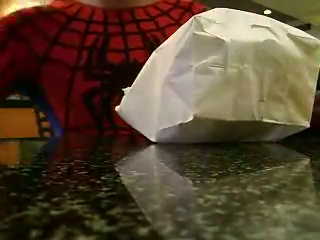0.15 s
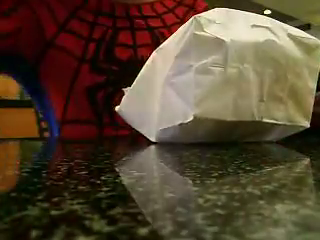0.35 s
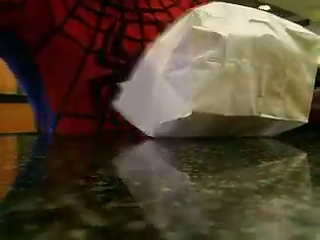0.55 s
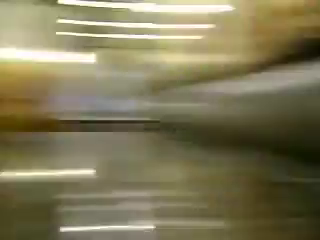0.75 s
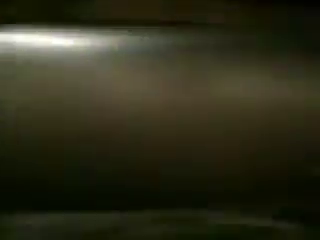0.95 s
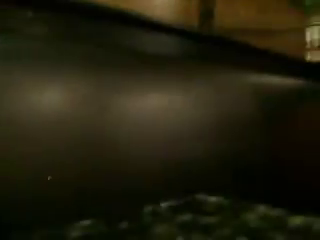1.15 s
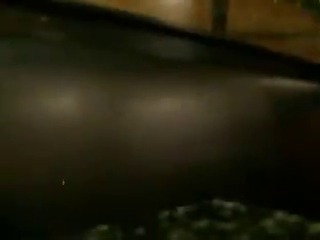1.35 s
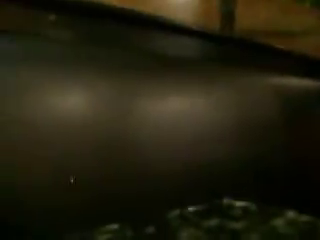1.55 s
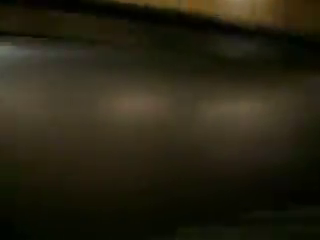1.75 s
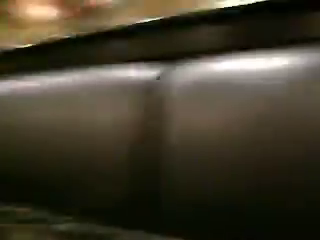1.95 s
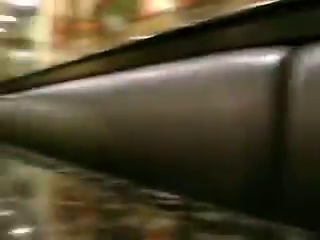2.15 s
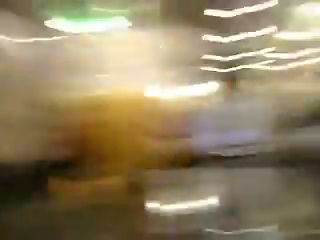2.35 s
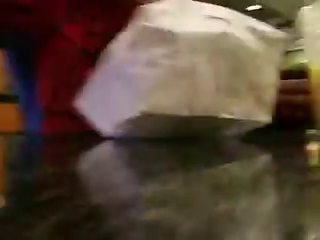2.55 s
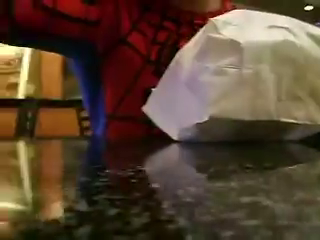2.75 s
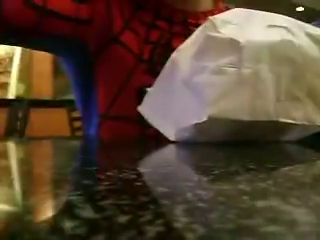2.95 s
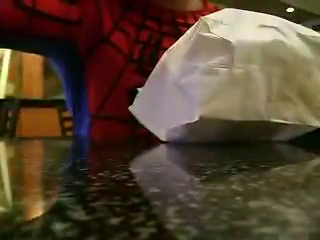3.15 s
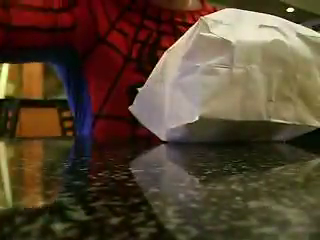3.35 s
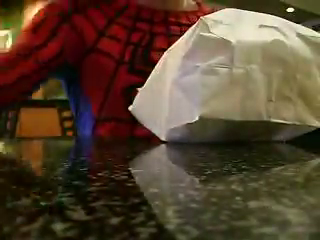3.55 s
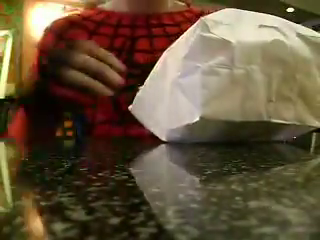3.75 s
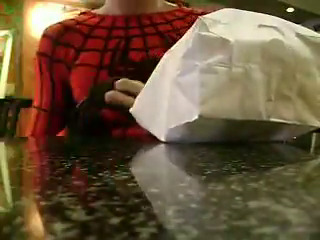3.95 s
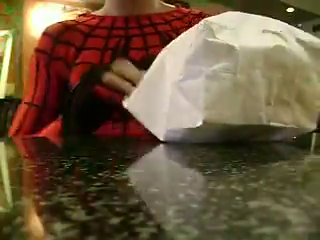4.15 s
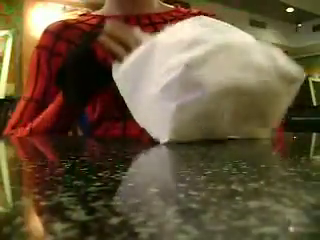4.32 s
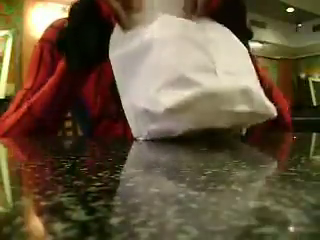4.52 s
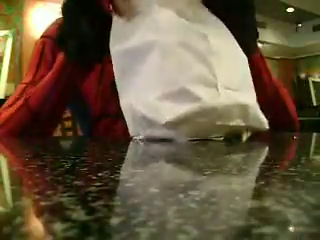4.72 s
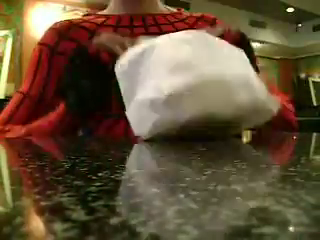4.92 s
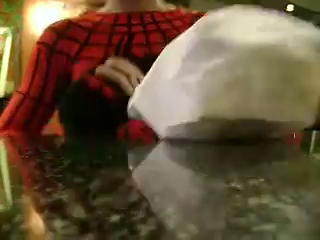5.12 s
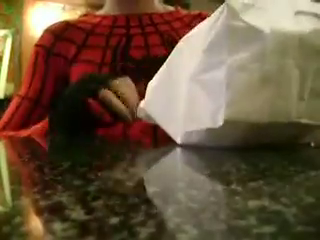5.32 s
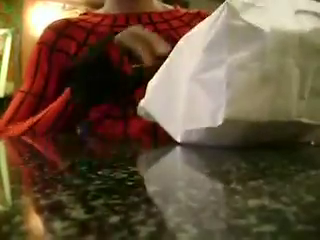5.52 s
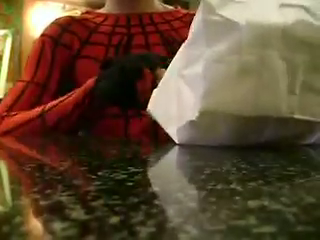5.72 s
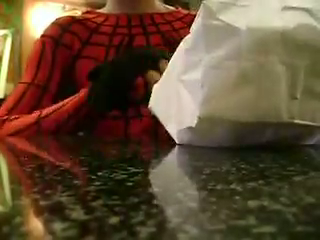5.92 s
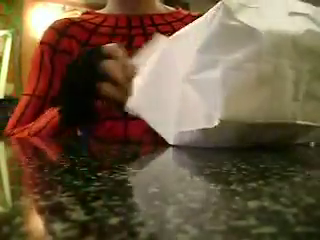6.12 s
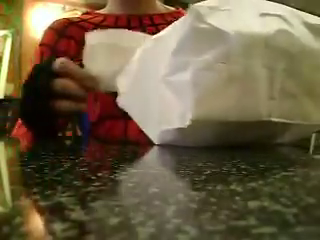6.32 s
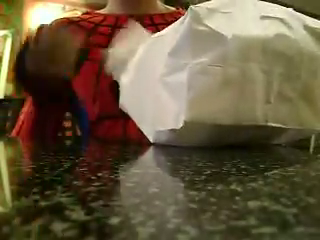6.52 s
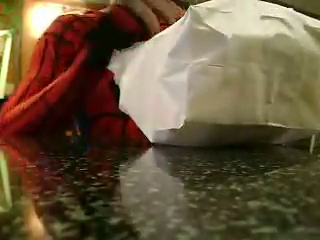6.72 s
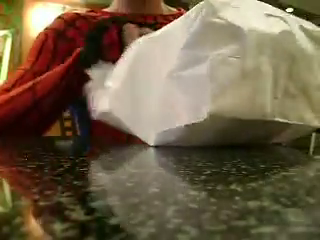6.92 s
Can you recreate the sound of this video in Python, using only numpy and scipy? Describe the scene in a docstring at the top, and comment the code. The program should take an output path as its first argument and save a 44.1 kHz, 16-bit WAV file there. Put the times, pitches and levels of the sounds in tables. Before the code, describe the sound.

Over the steady drone of ventilation and kitchen machines in a large eatery, clacking knocks and scraping friction hit the microphone in two bouts, the first with a short creak, as the recorder is moved on a stone table. The handling settles, and a paper bag is handled and rummaged through very close, with uneven crinkling and crisp snaps. Everything sounds near and fairly dry, with muted highs and slight overload on the hardest knocks.

```python
"""Sharp knocks, rubbing and a creak sound right at the microphone: a small recorder on a stone table is
grabbed, swung away and swung back. Impacts ring its case, friction hisses on it and a joint sticks and slips.
Then hands lift, turn and open a paper bag, which rustles and snaps as its creases buckle.
Behind it all, fans and machines drone in the hall of a large eatery.
The recorder passes little above 6 kHz and overloads on the loudest peaks."""
import sys
import numpy as np
from scipy import signal
from scipy.io import wavfile
from scipy.ndimage import uniform_filter1d

SR = 44100
rng = np.random.default_rng(int(sys.argv[2]) if len(sys.argv) > 2 else 0)


def store_wav(level_fs):
    """Save 16-bit WAV to argv[1]."""
    pcm = np.round(np.clip(np.atleast_2d(level_fs), -1, 1) * 32767)
    wavfile.write(sys.argv[1], SR, pcm.T.astype(np.int16))


N = 311787

# Impacts on the case: start_s, peak_db, ring_hz, thud_re_peak_db, contact_cycles (of the ring)
CASE_IMPACTS = [(0.303, -14.5, 1270, -21, 8.1), (0.569, -0.5, 1490, -15.5, 6.6),
                (0.58, -1.5, 1500, -5, 6.3), (0.664, -3.5, 2550, -16, 5.3), (0.688, -4, 2860, -15, 4.7),
                (0.711, -0.5, 2960, -11, 8.5), (0.814, -15, 1970, -8, 3.6), (0.828, 1.5, 1800, -9, 4.3),
                (0.84, -1, 1850, -20, 13.6), (0.883, -13, 1860, -20, 7.0), (0.92, -2, 2900, -16, 5.4),
                (0.933, -10, 2040, -27, 7.0), (1.019, 0, 3940, -15, 3.5), (1.063, -2.5, 1320, -9, 3.5),
                (1.076, -2.5, 1530, -6, 5.6), (1.106, -2, 2160, -22, 5.7), (1.219, 0.5, 3530, -17, 8.5),
                (1.408, -16.5, 2210, -5, 7.9), (1.716, -10.5, 2620, 2, 6.4), (1.754, -6, 2920, -10, 4.2),
                (1.827, -7, 2630, -18, 4.9), (1.833, -6.5, 2010, -19, 5.5), (1.921, 0.5, 2950, -36, 3.1),
                (2.023, -1.5, 2800, -13.5, 4.3), (2.031, -8.5, 3740, -4.5, 4.9),
                (2.158, -12.5, 2130, -23, 6.5), (2.189, -0.5, 4090, -27, 7.0), (2.205, -2, 2740, -26, 15.6),
                (2.263, -8, 2020, -14, 6.4), (2.278, -3, 2670, -12, 3.6), (2.292, 3.5, 1670, -5, 10),
                (2.325, 2.5, 1600, -9.5, 8.4), (2.343, 2, 1730, -21, 7.0), (2.357, -2, 2050, -12, 7.7),
                (2.365, 1, 2340, -8.5, 8.6), (2.375, 1.5, 2060, -3.5, 5.1), (2.409, -2.5, 2820, -7, 6.5),
                (2.485, -4, 1550, -30, 8.5), (2.508, 3, 1950, -23, 7.9), (2.532, -2.5, 1980, -19, 6.1),
                (2.557, -4, 2720, -19, 4.4), (2.568, 0, 3100, -10, 8.3), (2.575, -4, 1740, -4.5, 5.4),
                (2.601, -3, 3050, -9.5, 17), (2.632, -11, 1720, 3, 4.2), (2.949, -6, 2860, -37, 5.1)]

def case_knocks():
    """Impact excitation: each blow rings a damped panel resonance and sends a dull thud through the case."""
    out, noise = np.zeros(N), rng.standard_normal((len(CASE_IMPACTS), 2, 4000))
    thud_band = signal.butter(1, [170, 1000], "band", fs=SR, output="sos")
    for (start_s, peak_db, ring_hz, thud_db, cycles), (sharp, soft) in zip(CASE_IMPACTS, noise):
        contact_s = cycles / ring_hz
        crack = burst(sharp, contact_s, t60_s=5.5 * contact_s, rise_s=0.00018, low_hz=720)
        ring = resonate(crack, ring_hz, width_hz=750)
        add(out, start_s, ring + from_db(-7) * crack, peak_db)
        thud = burst(soft, contact_s, t60_s=0.053, rise_s=0.0017, low_hz=59.8)
        add(out, start_s, signal.sosfilt(thud_band, thud), peak_db + thud_db)
    return out


# Drag on the case, a list per move (swing away, hold, swing back, bump along, settle): time_s, level_db
RUB_MOVES = [
    [(0.55, -47), (0.6, -35.5), (0.65, -32.5), (0.7, -23), (0.85, -22), (0.95, -26), (1.02, -24.5),
     (1.06, -28), (1.12, -46)],
    [(1.13, -32), (1.2, -37.5), (1.35, -42.5), (1.52, -38), (1.65, -55)],
    [(1.7, -40), (1.755, -48), (1.77, -25.5), (1.84, -21), (1.93, -26.5), (2.07, -30), (2.1, -36.5),
     (2.2, -33), (2.23, -40)],
    [(2.25, -51), (2.265, -21.5), (2.32, -20), (2.362, -8.5), (2.39, -25.5), (2.44, -22), (2.52, -19),
     (2.555, -26.5), (2.64, -30)],
    [(2.67, -35), (2.88, -35.5), (2.905, -30), (2.96, -36), (3.05, -35.5)],
]
# Weight of the low band in each of these moves: gain_db
RUB_BASS = [0, 7, -2, -2, -4.5]
# Spectral shape of the rubbed case: frequency_hz, gain_db
CASE_SPECTRUM = [(40, -2), (120, -6), (400, -0.5), (1100, 0), (1500, -7.5), (2000, -1), (3000, -0.5),
                 (4000, -3), (5500, -3.5)]

def case_rubbing():
    """Sliding friction: skin and table drag on the case, and countless tiny contacts merge into noise."""
    level, lows_gain = move_envelopes(RUB_MOVES, RUB_BASS)
    lows, highs = crackle(CASE_SPECTRUM, per_s=1600, spread_db=3.5, clump_db=1.46,
                          decay_s=0.0016, hiss_db=-5.5, split_hz=1650)
    return level * (highs + lows_gain * lows)


def case_creak():
    """Stick-slip motion: a joint gives way at uneven intervals, each slip briefly ringing one resonance."""
    start_s, strongest_s, end_s = 0.754, 0.894, 0.92
    ring_hz, slip_gap_s = 1906, 0.0135
    out, t = np.zeros(N), np.arange(700) / SR
    swell = t ** 2.1 * np.exp(-t / 0.0016)
    slip_s = start_s
    for late, detune, shortfall, phase in rng.standard_normal((30, 4)):
        if slip_s < end_s:
            effort_db = np.interp(slip_s, [start_s, strongest_s, end_s], [-12.5, -5, -12.5])
            pitch_hz = ring_hz * (1 + 0.024 * detune)
            ring = swell * np.sin(2 * np.pi * (pitch_hz * t + phase))
            add(out, slip_s, ring, effort_db - 4.5 * abs(shortfall))
        slip_s += slip_gap_s * np.exp(0.23 * late)
    return out


# Hands on the bag, a list per move (lift, turn, lay down, reach in, rummage, pull out): time_s, level_db
BAG_MOVES = [
    [(3.76, -47), (3.8, -26.5), (3.9, -31.5), (4.1, -28), (4.2, -25.5), (4.25, -30), (4.43, -26.5),
     (4.52, -28.5), (4.55, -32.5)],
    [(4.62, -35), (4.65, -27), (4.795, -25.5), (4.815, -19), (4.92, -17), (4.95, -27.5), (5.03, -26.5)],
    [(5.07, -24), (5.12, -16.5), (5.19, -24.5), (5.25, -24), (5.36, -29), (5.43, -38.5), (5.55, -43)],
    [(5.59, -36), (5.63, -28.5), (5.7, -28), (5.89, -34), (5.97, -27), (6.05, -26)],
    [(6.075, -17.5), (6.2, -16.5), (6.24, -23.5), (6.29, -19), (6.335, -12), (6.37, -16), (6.4, -24.5),
     (6.52, -24.5), (6.65, -36)],
    [(6.69, -34), (6.72, -28), (6.78, -31), (6.84, -16.5), (6.93, -34), (6.99, -26), (7.03, -29),
     (7.07, -29)],
]
# Weight of the low band in each of these moves: gain_db
BAG_BASS = [-7, -10, -7.5, -8.5, -10, -5]
# Spectral shape of the rustling paper: frequency_hz, gain_db
PAPER_SPECTRUM = [(60, 0), (200, -3), (450, 3.5), (800, 4), (1130, 5), (1700, 0), (2450, 4), (3500, -1),
                  (5500, -6.5)]

def bag_rustle():
    """Buckling of a thin sheet: the paper gives under the hands in dense clusters of tiny clicks."""
    level, lows_gain = move_envelopes(BAG_MOVES, BAG_BASS)
    lows, highs = crackle(PAPER_SPECTRUM, per_s=1100, spread_db=2, clump_db=2.5,
                          decay_s=0.0011, hiss_db=-3, split_hz=970)
    return level * (highs + lows_gain * lows)


# Large creases giving way: start_s, peak_db, low_mode_re_peak_db
CREASE_SNAPS = [(3.8072, -10, -13), (3.8215, -8.5, -22), (3.8486, -11, -19), (3.907, -11.5, -6),
                (4.0439, -16, -4), (4.0595, -6.5, -7), (4.198, -7.5, 0), (4.4042, -10, -8),
                (4.4325, -9.5, -6), (4.494, -5.5, -12), (4.5212, -11.5, -9), (4.63, -9.5, -19),
                (4.7606, -5, -14), (4.807, -5, -23), (4.8311, -3, -22), (4.8689, -4.5, -15),
                (4.9638, -9.5, -6), (5.0402, -3, -16.5), (5.0796, -9.5, -18), (5.0916, -10, -10),
                (5.1233, -3, -17), (5.1497, -6.5, -16), (5.248, -7.5, -15), (5.6044, -12.5, -12),
                (5.6289, -13, -1.5), (5.6815, -9.5, -12), (5.6874, -7, -14), (5.8177, -8.5, -4),
                (5.9295, -8.5, -8.5), (5.9728, -10, -8), (6.0751, -9, -8), (6.1434, -6.5, -4.5),
                (6.1938, -2.5, -12.5), (6.2974, -8, -13), (6.4457, -9.5, -12), (6.492, -3.5, -11),
                (6.5355, -12, -14), (6.579, -12.5, -6.5), (6.7251, -8, -4), (6.845, -7, -11),
                (6.9087, -3.5, -10), (6.983, -10.5, -7)]
# Broad resonances of the bag walls: centre_hz, width_hz
WALL_MODES = [(1130, 130), (2490, 300)]

def bag_snaps():
    """Snap-through buckling: each crease excites two wall modes, which shift as the bag changes shape."""
    out, noises = np.zeros(N), rng.standard_normal((len(CREASE_SNAPS), 3000))
    (low_hz, low_width_hz), (high_hz, high_width_hz) = WALL_MODES
    for (start_s, peak_db, low_mode_db), noise in zip(CREASE_SNAPS, noises):
        crack = burst(noise, contact_s=0.00073, t60_s=0.014, rise_s=0.00055, low_hz=510)
        low_shift, high_shift = np.exp(0.12 * noise[-2:])
        high_mode = resonate(crack, high_hz * high_shift, high_width_hz)
        low_mode = resonate(crack, low_hz * low_shift, low_width_hz)
        add(out, start_s, high_mode + from_db(-7) * crack, peak_db)
        add(out, start_s, low_mode, peak_db + low_mode_db)
    return out


def hall_reverberation(near, t60_s=0.14):
    """Diffuse reflection: the hall's return is a convolution with exponentially decaying noise."""
    t = np.arange(int(.6 * SR)) / SR
    tail = rng.standard_normal(len(t)) * from_db(-60 * t / t60_s) * (t > .006)
    return signal.fftconvolve(near, tail / np.sqrt(np.sum(tail ** 2)))[:N]


# Spectral shape of the ventilation and kitchen machines: frequency_hz, gain_db
DRONE_SPECTRUM = [(25, -3.5), (35, -14.5), (75, -6.5), (130, -10.5), (200, -11), (420, -8), (800, -6),
                  (1150, -6.5), (1550, -17.5), (2400, -14.5), (5000, -24)]
# Slow course of their drone: time_s, level_db
DRONE_LEVELS = [(0, -30), (1.0, -31), (2.801, -29), (3.399, -30.5), (7.07, -31.5)]
# Motor tones: pitch_hz, rms_db
MOTOR_TONES = [(120, -53.5), (144, -48.5), (260, -48), (384, -46.5), (431, -53.5), (501, -44.5),
               (572, -51.5), (790, -50)]

def hall_machines():
    """Superposition: fans and machines blur into a wavering drone, with faint narrow-band motor tones."""
    t = np.arange(N) / SR
    drone = rms_one(coloured(rng.standard_normal((2, N)), DRONE_SPECTRUM))
    drone *= from_db(0.71 * drift(rate_hz=13))
    time_s, level_db = np.transpose(DRONE_LEVELS)
    noises = rng.standard_normal((len(MOTOR_TONES), N))
    tones = sum(from_db(rms_db) * rms_one(resonate(noise, pitch_hz, width_hz=7.7))
                for (pitch_hz, rms_db), noise in zip(MOTOR_TONES, noises))
    return from_db(np.interp(t, time_s, level_db)) * drone + tones


def burst(noise, contact_s, t60_s, rise_s, low_hz):
    """Damped transient: band-limited noise rises, holds during contact, then decays exponentially."""
    t = np.arange(len(noise)) / SR
    band = signal.sosfilt(signal.butter(2, [low_hz, 5600], "band", fs=SR, output="sos"), noise)
    attack = 1 - np.exp(-t / rise_s)
    decay = from_db(-60 * np.maximum(t - contact_s, 0) / max(t60_s, .004))
    return band * attack * decay


def crackle(spectrum, per_s, spread_db, clump_db, decay_s, hiss_db, split_hz):
    """Shot noise: clustered, decaying puffs of uneven size over hiss, as low and high bands of rms 1."""
    onsets = rng.random(N) < per_s * from_db(clump_db * drift(rate_hz=25)) / SR
    sizes = onsets * from_db(spread_db * np.minimum(rng.exponential(1, N), 4))
    pole = np.exp(-1 / (decay_s * SR))
    puffs = rms_one(signal.lfilter([1], [1, -pole], sizes))
    sound = coloured((puffs + from_db(hiss_db)) * rng.standard_normal((2, N)), spectrum)
    lows = signal.sosfilt(signal.butter(2, split_hz, fs=SR, output="sos"), sound)
    highs = signal.sosfilt(signal.butter(2, split_hz, "high", fs=SR, output="sos"), sound)
    return rms_one(lows), -rms_one(highs)   # opposite signs let the bands join without a notch


def move_envelopes(moves, bass_db):
    """Amplitude envelopes: the overall gain from first move to last, and each move's low-band gain."""
    t = np.arange(N) / SR
    time_s, level_db = np.transpose(np.concatenate(moves))
    gate = uniform_filter1d(1. * (t >= time_s[0]) * (t <= time_s[-1]), size=600, mode="nearest")
    starts_s = [rows[0][0] for rows in moves]
    move = np.clip(np.searchsorted(starts_s, t) - 1, 0, len(moves) - 1)
    lows_db = uniform_filter1d(np.array(bass_db, float)[move], size=2000)
    return gate * from_db(np.interp(t, time_s, level_db)), from_db(lows_db)


def resonate(x, hz, width_hz):
    """Damped oscillator: a two-pole resonance with unit gain at its peak."""
    r = np.exp(-np.pi * width_hz / SR)
    feedback = [1, -2 * r * np.cos(2 * np.pi * hz / SR), r * r]
    return signal.lfilter(np.array([1, 0, -1]) * (1 - r * r) / 2, feedback, x)


def coloured(noises, spectrum):
    """Spectral shaping: parallel third-octave bands, fed by the noises in turn, follow the spectrum."""
    edges_hz = 22 * 2 ** np.arange(0, 8.4, 1 / 3)
    frequency_hz, gain_db = np.transpose(spectrum)
    out = np.zeros(N)
    for k, (low, high) in enumerate(zip(edges_hz, edges_hz[1:])):
        band = signal.butter(2, [low, high], "band", fs=SR, output="sos")
        band_db = np.interp(np.log(np.sqrt(low * high)), np.log(frequency_hz), gain_db)
        out += from_db(band_db) * signal.sosfilt(band, noises[k % len(noises)])
    return out


def drift(rate_hz):
    """Random modulation: low-passed noise of rms 1, drawn at every 20th sample and interpolated."""
    r = np.exp(-2 * np.pi * rate_hz * 20 / SR)
    slow = signal.lfilter([1], [1, -2 * r, r * r], rng.standard_normal(N // 20 + 2002))[2000:]
    return np.interp(np.arange(N) / 20, np.arange(len(slow)), rms_one(slow))


def add(out, start_s, sound, peak_db):
    """Linear mixing: one event joins the output, scaled to its peak level."""
    i = int(start_s * SR)
    out[i:i + len(sound)] += (from_db(peak_db) * sound / np.abs(sound).max())[:N - i]


def from_db(db):
    """Amplitude ratio of a level in decibels."""
    return 10 ** (np.asarray(db) / 20)


def rms_one(x):
    """Normalisation to unit power."""
    return x / np.sqrt(np.mean(x ** 2) + 1e-20)


def scene():
    """Direct and reverberant fields: the close sounds add to their faint return and the machines."""
    near = case_rubbing() + case_knocks() + case_creak() + bag_rustle() + bag_snaps()
    return (near + from_db(-21) * hall_reverberation(near) + hall_machines())[None]


def record(dry):
    """Clipping distortion: low-passed sound overloads, spilling treble up to a final steep cutoff."""
    stopband_hz, overload, cutoff_hz = 6830, .73, 16300
    narrow = signal.sosfilt(signal.cheby2(14, 85, stopband_hz, fs=SR, output="sos"), dry)
    clipped = np.clip(narrow, -overload, overload)
    return signal.sosfiltfilt(signal.ellip(8, .1, 40, cutoff_hz, fs=SR, output="sos"), clipped)


dry = scene()
out = record(dry)
store_wav(out)
```